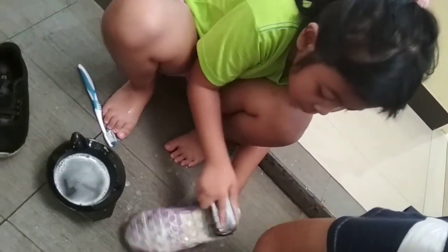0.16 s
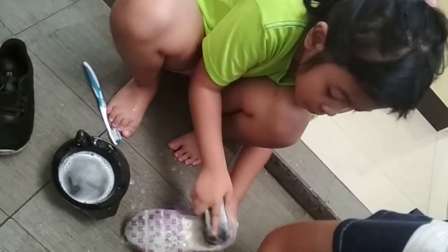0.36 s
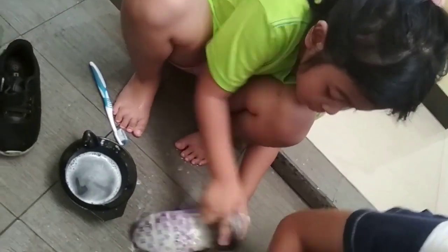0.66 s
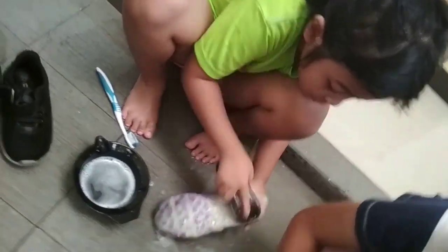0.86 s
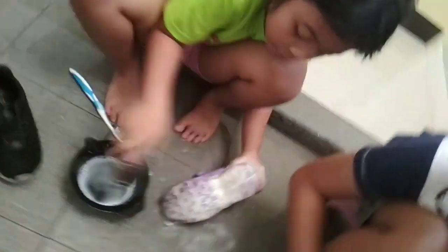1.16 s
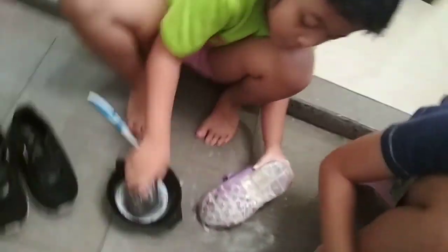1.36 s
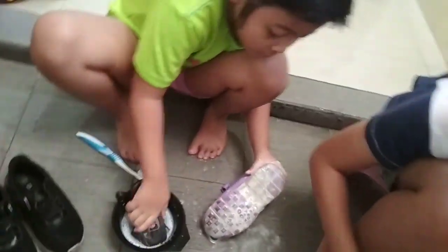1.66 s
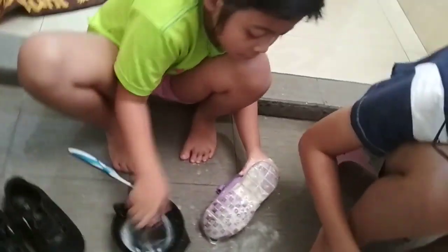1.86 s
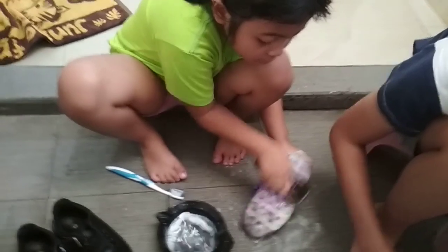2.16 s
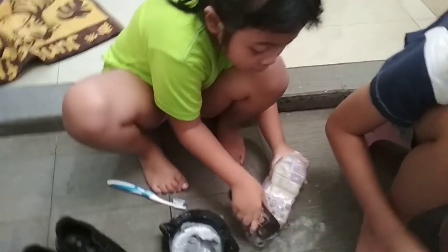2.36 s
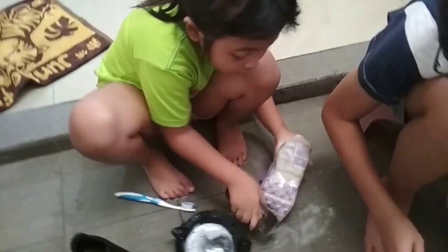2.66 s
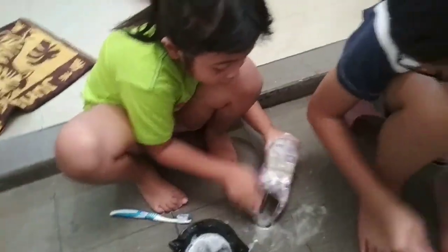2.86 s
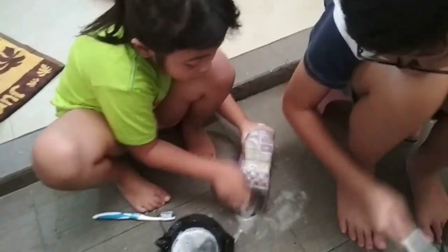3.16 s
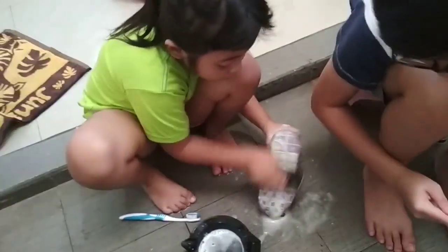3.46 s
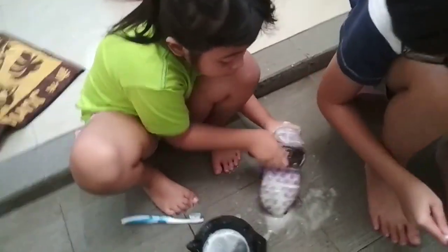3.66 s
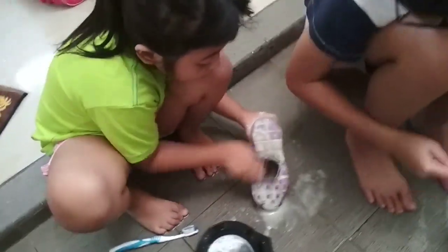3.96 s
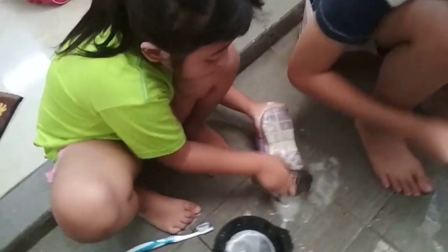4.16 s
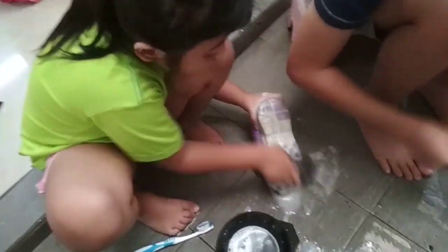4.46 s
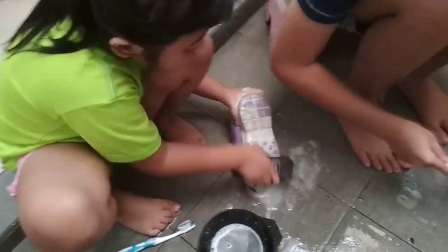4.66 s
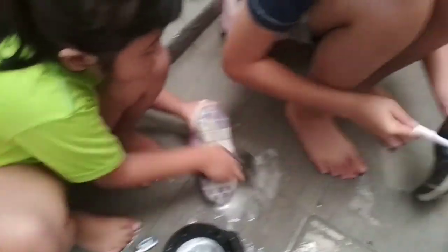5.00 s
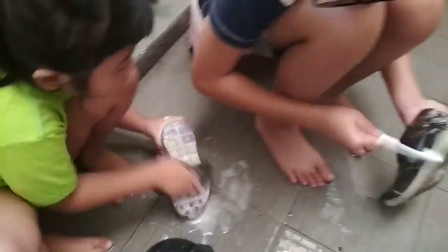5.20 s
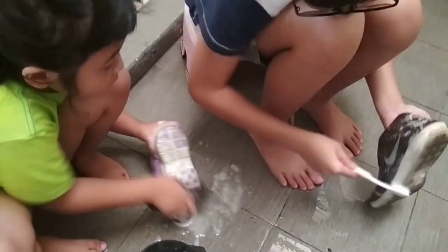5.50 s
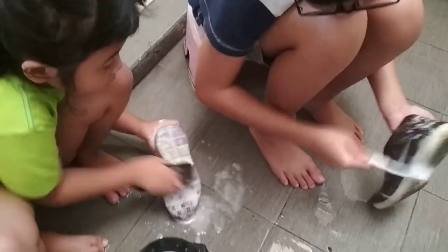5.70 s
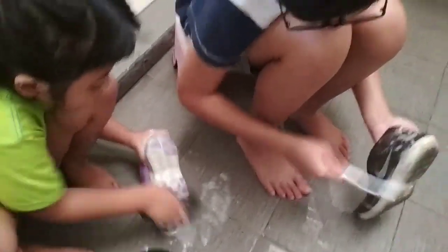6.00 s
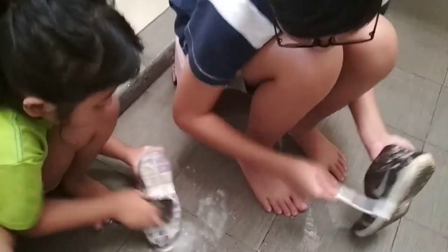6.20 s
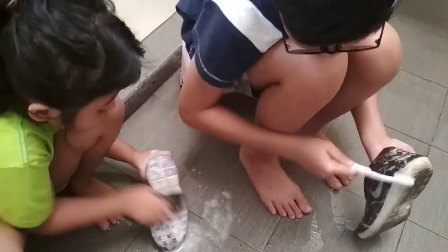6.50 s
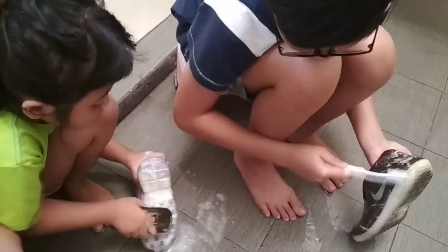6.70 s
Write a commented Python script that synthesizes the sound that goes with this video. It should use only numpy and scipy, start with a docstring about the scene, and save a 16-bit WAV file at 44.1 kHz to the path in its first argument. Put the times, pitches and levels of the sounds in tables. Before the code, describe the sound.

Two stiff brushes scrub wet, soapy shoes in quick scratchy strokes, with a brief knock on a tiled floor near the start.

```python
"""A low boom dies away under the quick hiss of two stiff brushes scrubbing wet shoes over a tiled floor.
Bristle tips flick off the tread in dense impulses whose level follows the speed of the hand. Something
knocks on the tiles and rings in damped modes. After the first second the harder brush bears down on a
hollow shoe, whose cavity resonates with a drone at each push. A faint hum comes and goes."""
import sys
import numpy as np
from scipy import signal
from scipy.fft import rfft, irfft, next_fast_len
from scipy.io import wavfile
from scipy.ndimage import uniform_filter1d, map_coordinates

SR = 44100
rng = np.random.default_rng(int(sys.argv[2]) if len(sys.argv) > 2 else 0)


def generate_wav(sig):
    """Save sig (samples, or channels by samples) to the path in sys.argv[1] as 16-bit PCM at SR."""
    pcm = np.round(np.clip(np.atleast_2d(sig).T, -1, 1) * 32767).astype(np.int16)
    wavfile.write(sys.argv[1], SR, pcm)


N = 301633
T = np.arange(N) / SR

# Brush strokes, from one turn of the hand to the next: (time [s], speed at the turn [dB],
# share spent speeding up [0-1], full speed [dB], relative level of the wet rasp [dB])
STROKES = [(0.0, -46, 0, -37.5, -12), (0.089, -48, 0.47, -36.5, -12.5), (0.207, -43, 0.5, -39.5, -13.5),
           (0.334, -45, 0.45, -38, -16), (0.476, -44, 0.6, -37.5, -15), (0.624, -45.5, 0.6, -39.5, -15),
           (0.723, -39.5, 0, -40.5, -16.5), (0.808, -43.5, 0.56, -40.5, -18),
           (0.923, -45.5, 0.77, -38, -20), (1.055, -43.5, 0.74, -38.5, -12), (1.142, -39.5, 0.6, -38, -8.5),
           (1.199, -44.5, 0.57, -34.5, -14.5), (1.444, -42, 0.57, -36.5, -9), (1.56, -42, 0.64, -35, -9.5),
           (1.683, -40.5, 0.58, -35.2, -11.5), (1.811, -40, 0.85, -37.5, -10.5),
           (1.948, -39, 0.5, -36.5, -9.5), (2.068, -36.5, 0.3, -36.5, -10), (2.125, -38.5, 0.87, -34, -9.5),
           (2.225, -37.5, 0, -36, -11), (2.297, -40, 0.4, -39, -6), (2.407, -46, 0.7, -37.5, -10),
           (2.564, -43.5, 0.61, -37, -9), (2.691, -46, 0.54, -35.5, -9.5), (2.901, -40.5, 0.7, -35.5, -9.5),
           (3.01, -40.5, 0.37, -37, -11.5), (3.1, -38.5, 0.34, -37, -8.5), (3.2, -40, 0.53, -36, -10.5),
           (3.288, -41.5, 0.7, -34, -13.5), (3.405, -38, 0.16, -36, -10), (3.515, -40.5, 0.2, -40.5, -7),
           (3.607, -41.5, 0.58, -36.5, -12.5), (3.699, -43, 0.58, -36.5, -10),
           (3.811, -40.5, 0.7, -37.5, -11.5), (3.894, -41.5, 0.86, -35.5, -12.5),
           (4.013, -39, 0.45, -35.5, -11.5), (4.118, -41, 0.74, -33, -13), (4.21, -38, 0.22, -35.5, -12),
           (4.308, -40.5, 0.48, -34, -15), (4.405, -38.5, 0.4, -40.5, -12.5),
           (4.465, -37.5, 0.7, -36, -12.5), (4.652, -39.5, 0.1, -39, -9.5), (4.712, -41, 0.26, -40, -7),
           (4.777, -45.5, 0.7, -40.5, -9.5), (4.899, -44, 0.9, -40.5, -9), (4.976, -40.5, 0.26, -36.5, -17),
           (5.098, -37, 0.63, -36, -11), (5.188, -42.5, 0.6, -37, -14.5), (5.303, -42, 0.7, -39, -8.5),
           (5.398, -39, 0.8, -37.5, -16.5), (5.502, -38, 0.57, -36.5, -12),
           (5.592, -43, 0.93, -35.5, -14.5), (5.695, -40.5, 0.49, -36, -17),
           (5.822, -43.5, 0.8, -35.5, -15.5), (5.929, -39, 0.4, -36, -16.5),
           (6.024, -37.5, 0.6, -34.5, -21.5), (6.129, -40.5, 0.35, -34.5, -12.5),
           (6.231, -41.5, 0.7, -35.0, -15.5), (6.346, -39.5, 0.83, -36.5, -12.5),
           (6.448, -40.5, 0.6, -35, -13), (6.553, -36, 0.3, -34.5, -11.5), (6.657, -41, 0.53, -34.5, -11.5),
           (6.767, -41.5, 0.5, -35, -12.5)]
ORDINARY_DB = -37  # an ordinary stroke on that speed scale, and the reference level of the hiss
# Spectrum of the wet rasp: (frequency [Hz], relative density [dB])
RASP_SPECTRUM = [(700, -66), (1050, -8), (1250, -7.5), (1500, -4), (2000, -0.5), (2800, -4.5), (3400, -2.5),
                 (4400, 0.5), (5500, -2.5), (8000, -3.5), (10000, -0.5), (12000, -53)]


def amp(db):
    """Amplitude ratio of a level in decibels."""
    return 10 ** (np.asarray(db) / 20)


def unit(x):
    """Normalisation to an rms of 1."""
    return x / np.sqrt(np.mean(x ** 2) + 1e-20)


def along(points, hz):
    """Interpolation of (frequency, value) points on a logarithmic axis, end values held."""
    f, v = np.transpose(points)
    return np.interp(np.log(hz + 1), np.log(f + 1), v)


def envelope(points):
    """Amplitude envelope through (time, level) points, silent outside them."""
    s, db = np.transpose(points)
    return amp(np.interp(T, s, db, left=-140, right=-140))


def wobble(rate):
    """Smooth random modulation: a spline through `rate` Gaussian values a second."""
    return map_coordinates(rng.standard_normal(int(N * rate / SR) + 4), [T * rate])


def filtered(x, response):
    """Linear filtering: the spectrum of x is multiplied by a frequency response."""
    m = next_fast_len(N + 8192)
    return irfft(rfft(x, m) * response(np.fft.rfftfreq(m, 1 / SR)), m)[..., :N]


def grainy_noise(spectrum, spread_db, bunch_db, patchy_db):
    """Superposition: dense impulses of uneven size merge into partly coherent stereo noise of rms 1."""
    # Likeness of the two channels: (frequency [Hz], left-right correlation [0-1])
    coherence = [(60, 0.96), (300, 0.83), (700, 0.67), (1400, 0.043), (15000, 0.0084)]
    sizes = amp(spread_db * rng.exponential(size=N) + bunch_db * wobble(350))
    bins = signal.stft(sizes * rng.standard_normal((2, N)), nperseg=256)[2]
    patches = uniform_filter1d(rng.standard_normal(bins.shape[1:]), size=2, axis=0)
    patches = uniform_filter1d(patches, size=8, axis=1)  # each band flickers on its own
    pair = signal.istft(bins * amp(patchy_db * unit(patches)), nperseg=256)[1][:, :N]

    def mid_side_response(hz):
        angle = np.arccos(np.clip(along(coherence, hz), -1, 1)) / 2
        return amp(along(spectrum, hz)) * [np.cos(angle), np.sin(angle)]

    mid, side = filtered(pair, mid_side_response)
    return unit(np.array([mid + side, mid - side]))


def room_hush():
    """Ambient noise: a faint floor with most of its power at low frequencies."""
    # Spectrum of the still room: (frequency [Hz], relative density [dB])
    spectrum = [(20, 10), (80, 7.5), (150, 1.5), (300, -35), (600, -50), (900, -56), (2000, -30),
                (16000, -42)]
    return amp(-77) * grainy_noise(spectrum, spread_db=-1.5, bunch_db=2.5, patchy_db=1.5)


def hum(pitch_hz=138, rise_db_per_s=142, fade_db_per_s=50):
    """Amplitude modulation: a faint, wavering low tone swells and fades."""
    # Crests of the hum: (time [s], level [dB])
    crests = [(.99, -78.5), (1.326, -82), (1.68, -76), (2.13, -79)]
    flutter = amp(2.7 * wobble(13))
    phase = 2 * np.pi * np.cumsum(pitch_hz * (1 + 0.03 * wobble(26.3))) / SR
    swells = sum(amp(db + rise_db_per_s * np.minimum(T - s, 0) - fade_db_per_s * np.maximum(T - s, 0))
                 for s, db in crests)
    return swells * flutter * np.sqrt(2) * np.sin(phase)


def boom(pitch_hz=90.5):
    """Room resonance: one low mode dies away unevenly, with rumble around it."""
    # Decay of the boom: (time [s], level [dB])
    decay = [(0.0, -42.5), (0.064, -44), (0.122, -49), (0.16, -45.5), (0.232, -48.5), (0.256, -54.5),
             (0.302, -49.5), (0.348, -62.5), (0.42, -62)]
    # Spectrum of the rumble: (frequency [Hz], relative density [dB])
    spectrum = [(25, 5.5), (50, -1), (130, 3.5), (200, -14.5), (280, -27)]
    phase = 2 * np.pi * np.cumsum(pitch_hz * (1 + 0.029 * wobble(22))) / SR
    rumble = unit(filtered(rng.standard_normal(N), lambda hz: amp(along(spectrum, hz))))
    return envelope(decay) * (np.sqrt(2) * np.sin(phase) + amp(-6.5) * rumble)


def knock_tail():
    """Resonance near 500 Hz, low and rough: faint before the knocks, swelling with them, then dying."""
    # Course of the resonance: (time [s], level [dB])
    course = [(0.0, -66), (0.104, -89), (0.138, -70), (0.172, -75), (0.2, -94), (0.26, -86), (0.284, -79),
              (0.31, -84), (0.36, -87), (0.42, -54.5), (0.448, -48.5), (0.5, -66), (0.54, -47), (0.61, -55),
              (0.794, -67), (0.87, -93)]
    # Spectrum of the resonance: (frequency [Hz], relative density [dB])
    spectrum = [(300, -40), (370, -6), (410, -2.5), (470, 4), (540, -10), (620, -1.5), (700, -29),
                (800, -39)]
    return envelope(course) * grainy_noise(spectrum, spread_db=2, bunch_db=-1.5, patchy_db=0)


def tiled_room(x):
    """Reverberation: convolution with a noise tail in which each frequency decays at its own rate."""
    # Reverberation time of the room: (frequency [Hz], T60 [s])
    decay_times = [(150, 0.21), (250, 0.22), (500, 0.73), (800, 0.35), (1300, 0.67), (1700, 0.61),
                   (3000, 0.14)]
    hz, t, bins = signal.stft(rng.standard_normal((2, SR // 2)), SR, nperseg=256)
    tail = signal.istft(bins * amp(-60 * t / along(decay_times, hz)[:, None]), SR, nperseg=256)[1]
    tail[1] = 0.34 * tail[0] + 1.07 * tail[1]  # the right channel shares part of the left
    return signal.fftconvolve(x[None], tail / np.linalg.norm(tail[0]), axes=1)[:, :N]


def knocks():
    """Modal vibration: each contact excites the same damped modes; a brighter one favours the high ones."""
    # Contacts with the tiles: (time [s], relative level [dB], treble tilt [dB/octave], attack [s])
    contacts = [(0.406, -51, 9, 0.0042), (.42, -44, 12.5, .008), (.44, -35, 12, 0.0029),
                (0.458, -44, -2, 0.0028), (0.479, -41.5, 3, 0.0027), (0.515, -42.5, -11, 0.002),
                (0.53, -43, 5, 0.0039), (0.466, -50, 6, .003), (.562, -43, 4, 0.0036),
                (0.589, -43, -4, 0.0079)]
    # Modes of the knocked object: (frequency [Hz], relative level [dB], T60 [s])
    modes = [(207, -1.5, 0.068), (273, -3, 0.094), (404, -4, 0.047), (500, -6, 0.063), (620, -23, 0.039),
             (755, -1, 0.025), (1005, -6, 0.023), (1232, 4, 0.014), (1420, 7, 0.012), (1670, -3.5, .01),
             (2130, -18, 0.012)]
    out, t = np.zeros(N + SR), T[:SR // 2]
    mode = lambda hz, db, t60: amp(db - 60 * t / t60) * np.sin(2 * np.pi * hz * t)
    for s, db, tilt, attack in contacts:
        low = sum((-1) ** k * mode(hz, mode_db + rng.normal(0, 1), t60)  # neighbours move oppositely
                  for k, (hz, mode_db, t60) in enumerate(modes[:4]))
        high = sum(mode(hz, mode_db + tilt * np.log2(hz / 500), t60) for hz, mode_db, t60 in modes[4:])
        onset = 1 - np.exp(-(t / attack) ** 2)
        out[round(s * SR):][:len(t)] += amp(db - 5.5) * onset * (low + high)
    return out[:N]


def hand_speed(fall_exponent=2.07):
    """Reciprocating motion: speed rises and falls on quarter-sine arcs; 1 is an ordinary stroke."""
    turns, turn_db, share, full_db = np.transpose(STROKES)[:4]
    k = np.searchsorted(turns, T, side="right") - 1  # the stroke under way
    progress = (T - turns[k]) / np.diff(turns, append=N / SR)[k]
    share = np.clip(share, 0.05, 0.95)[k]
    rising = progress < share
    next_turn_db = np.append(turn_db[1:], turn_db[-1] + 7)
    at_turn = amp(np.where(rising, turn_db[k], next_turn_db[k]))
    ramp = np.clip(np.where(rising, progress / share, (1 - progress) / (1 - share)), 0, 1)
    arc = np.sin(np.pi / 2 * ramp) ** np.where(rising, 1, fall_exponent)
    return (at_turn + (amp(full_db[k]) - at_turn) * arc) / amp(ORDINARY_DB)


def block_bumps(attack_s=0.0042, t60_s=0.032):
    """Impact excitation: the brush block bumps the shoe, which answers with one damped sinusoid."""
    # Bumps on the shoe: (time [s], relative level [dB], frequency [Hz])
    bumps = [(1.087, -41.5, 504), (1.089, -50, 770), (1.577, -30.5, 506), (1.92, -39, 1240),
             (2.131, -32, 555), (2.276, -32.5, 1026), (2.374, -34, 440), (2.376, -36.5, 1010),
             (2.965, -36, 430), (3.331, -39, 550), (3.349, -39, 664), (3.34, -36.5, 397), (4.44, -42, 400),
             (4.579, -45, 340), (5.881, -43, 524), (5.92, -42, 790), (6.55, -42, 660)]
    out, t = np.zeros(N + SR), T[:SR // 8]
    for s, db, hz in bumps:
        gain = amp(db + 2.5 - 60 * t / t60_s) * (1 - np.exp(-t / attack_s))
        out[round(s * SR):][:len(t)] += gain * np.sin(2 * np.pi * hz * t)
    return out[:N]


def cavity_tones(slope_db_per_s=500):
    """Cavity resonance: the hollow shoe sings briefly on single, slightly wavering tones."""
    # Tones of the cavity: (time [s], hold [s], frequency [Hz], level [dB])
    tones = [(1.177, 0.024, 549, -65), (1.616, 0.075, 460, -67), (2.614, 0.051, 504, -59),
             (3.268, 0.08, 529, -60), (3.397, 0.047, 524, -68), (3.826, 0.079, 462, -56),
             (3.971, 0.046, 504, -59), (4.171, 0.13, 522, -59.5), (4.634, 0.088, 457, -60.5),
             (4.874, 0.043, 529, -61.5), (4.959, 0.06, 458, -62), (5.143, 0.086, 530, -62.5),
             (5.443, 0.05, 515, -62.5), (6.311, 0.03, 593, -64.5)]
    wavering_time = np.cumsum(1 + 0.0116 * wobble(30)) / SR
    out = np.zeros(N)
    for s, held, hz, db in tones:
        outside_hold_s = np.maximum(np.abs(T - s - held / 2) - held / 2, 0)
        gain = amp(db - slope_db_per_s * outside_hold_s)
        out += gain * np.sqrt(2) * np.sin(2 * np.pi * hz * wavering_time)
    return out


def push_gains(lands_s=1.082, rise_db_per_s=513):
    """Incoherent addition: pushes add in power, giving the gains of cavity, rub, deep rub and sole."""
    # The harder brush bears down on the shoe: (time [s], hold [s], cavity level [dB],
    # rub over cavity [dB], deep rub over cavity [dB], sole level [dB])
    pushes = [(1.089, 0.09, -58, -8.5, -25, -59), (1.272, 0.083, -51, -25, -30, -59),
              (1.428, 0.094, -56.5, -31, -28, -58.5), (1.585, 0.077, -50, -3.5, -10, -56),
              (1.719, 0.067, -50, -24, -26, -58), (1.868, 0.07, -56.5, -8.5, -13, -56),
              (1.992, 0.078, -53.5, -20, -28, -58), (2.131, 0.083, -49.5, -10, -22, -52),
              (2.275, 0.1, -51, -24, -27, -49), (2.372, 0.078, -54.5, -5, -27, -59),
              (2.471, 0.051, -51.5, -13.5, -20, -52.5), (2.576, 0.088, -55, -28, -29, -59.5),
              (2.709, 0.14, -54, -9, -23, -57.5), (2.943, 0.056, -49.5, -21.5, -41, -53),
              (3.064, 0.066, -53, -29, -28.5, -53), (3.188, 0.071, -56, -16, -22.4, -55),
              (3.325, 0.06, -54, -6.5, -12.5, -54.5), (3.42, 0.11, -57.5, -22, -23, -53.5),
              (3.596, 0.096, -55.5, -17.5, -28, -55.5), (3.722, 0.08, -57.5, -25, -27, -54.5),
              (3.84, 0.12, -63, -11, -26, -64), (3.917, 0.16, -56, -20.5, -30, -55.5),
              (4.14, 0.11, -52, -16, -35, -56.5), (4.331, 0.044, -55, -9.5, -24, -56),
              (4.443, 0.059, -54.5, -11, -16, -53.5), (4.572, 0.039, -56, 3, -18, -53),
              (4.65, 0.092, -53.5, -12, -28, -58), (4.811, 0.061, -54, -18, -28, -56),
              (4.956, 0.05, -55, -26, -34, -55.5), (5.07, 0.073, -58, -22, -25, -53),
              (5.2, 0.14, -59.5, -35, -28, -60), (5.367, 0.044, -58, -15.5, -32, -57),
              (5.473, 0.057, -54.5, -11.5, -32, -57.5), (5.597, 0.13, -61.5, -24, -28, -56.5),
              (5.872, 0.079, -56.5, -10, -21, -55), (6.014, 0.13, -58.5, -6.5, -33, -58),
              (6.121, 0.1, -59.5, -25, -30, -55.5), (6.282, 0.033, -58, -49, -32, -57),
              (6.4, 0.048, -60.5, -30, -24, -53), (6.518, 0.083, -54, -27, -28, -54),
              (6.666, 0.15, -56.5, -18, -31, -53.5)]
    s, held, cavity_db, rub_db, deep_db, sole_db = np.transpose(pushes)[..., None]
    t = T[::40]

    def contour_db(lag_s, fall_db_per_s):
        age = t - s - lag_s
        return rise_db_per_s * np.minimum(age, 0) - fall_db_per_s * np.maximum(age - held, 0)

    press_db = cavity_db + contour_db(lag_s=0, fall_db_per_s=218)
    drag_db = cavity_db + contour_db(lag_s=0.011, fall_db_per_s=203)
    scrape_db = sole_db + contour_db(lag_s=0.0078, fall_db_per_s=146)
    return [np.interp(T, t, np.linalg.norm(amp(db), axis=0) * (t > lands_s))
            for db in (press_db, drag_db + rub_db, drag_db + deep_db, scrape_db)]


def shoe():
    """Forced vibration: at each push the cavity drones, the shoe rubs the tiles and the sole scrapes."""
    # Spectra of cavity, rub, deep rub and sole: (frequency [Hz], relative density [dB])
    cavity_spectrum = [(220, -70), (300, -67), (360, -7), (415, 0.5), (440, -0.5), (463, 6.5), (484, -5),
                       (505, 6), (530, 0), (600, -2), (800, -4), (1100, -28), (1500, -72)]
    rub_spectrum = [(200, -70), (250, -13), (290, 0.5), (330, 3), (400, -3.5), (500, -70)]
    deep_spectrum = [(130, -70), (175, -9), (215, -0.5), (260, 2.5), (330, -33)]
    sole_spectrum = [(500, -70), (620, -17.5), (750, -6), (950, -2.5), (1300, -6), (2000, -9), (2600, -9),
                     (3500, -37), (5000, -63)]
    cavity_gain, rub_gain, deep_gain, sole_gain = push_gains()
    speed = uniform_filter1d(hand_speed(), size=1300)
    mean_speed = uniform_filter1d(speed, size=SR // 3)
    sole_gain *= (speed / (mean_speed + 1e-9)) ** 0.51  # the scrape dips at each turn
    cavity = cavity_gain * grainy_noise(cavity_spectrum, spread_db=1.5, bunch_db=-1, patchy_db=1.36)
    rub = rub_gain * grainy_noise(rub_spectrum, spread_db=1, bunch_db=-2, patchy_db=1.4)
    deep = deep_gain * grainy_noise(deep_spectrum, spread_db=0, bunch_db=-2.5, patchy_db=-0.5)
    scrape = sole_gain * grainy_noise(sole_spectrum, spread_db=1.5, bunch_db=-1, patchy_db=1)
    return cavity + rub + deep + scrape


def tuft_ticks(t60_s=0.004):
    """Elastic release: a stiff tuft springs free with a brief noise burst coloured like the rasp."""
    # Releases of single tufts: (time [s], relative level [dB])
    releases = [(3.4485, -29), (5.754, -26), (5.8844, -31), (5.9685, -28), (6.1744, -32)]
    gain = sum(amp(db - 14 - 60 * np.abs(T - s) / t60_s) for s, db in releases)
    return filtered(gain * rng.standard_normal((2, N)), lambda hz: amp(along(RASP_SPECTRUM, hz)))


def bristles(snap_attack_s=0.0033, snap_t60_s=0.13):
    """Stick-slip friction: the tips hiss as a power of hand speed; the suds follow it more sluggishly."""
    # Spectrum of the bristle tips: (frequency [Hz], relative density [dB])
    tip_spectrum = [(4000, -34.5), (6000, -13.5), (9200, -7), (9700, -3.5), (10600, 1.5), (12700, 4),
                    (14500, 0), (15200, -2.5), (16000, -4.5)]
    # Bristles catch and let go together: (time [s], relative level [dB])
    snaps = [(0.1142, -55), (0.2234, -42.5), (0.358, -36), (0.651, -49), (1.0634, -36.5), (2.242, -39),
             (3.447, -40), (3.716, -45), (1.822, -44), (3.827, -50), (3.938, -37), (4.139, -34),
             (4.4169, -39), (5.2136, -48), (5.3179, -38), (5.6232, -49), (5.706, -36), (5.8347, -57),
             (6.269, -35.5), (6.36, -38), (6.6808, -47)]
    speed = hand_speed()
    tip_gain = speed ** 1.62
    for s, db in snaps:
        onset = np.clip((T - s) / snap_attack_s, 0, 1)
        tip_gain += onset * amp(db - ORDINARY_DB + 2.5 - 60 * np.abs(T - s) / snap_t60_s)
    turns, rasp_db = np.transpose(STROKES)[[0, -1]]
    midstrokes = (turns + np.append(turns[1:], N / SR)) / 2
    wetness = amp(np.interp(T, midstrokes, rasp_db) + 1.5)
    suds_gain = wetness * uniform_filter1d(speed, size=1900) ** 1.66
    tips = tip_gain * grainy_noise(tip_spectrum, spread_db=0.5, bunch_db=0.5, patchy_db=1.3)
    suds = suds_gain * grainy_noise(RASP_SPECTRUM, spread_db=2.2, bunch_db=1.3, patchy_db=2.6)
    return amp(ORDINARY_DB) * (amp(-0.55) * tips + suds)


def scene():
    """Superposition: the pressures of all sources add; only the knocks reverberate."""
    hits = knocks()
    background = room_hush() + knock_tail()
    scrubbing = bristles() + tuft_ticks() + shoe() + block_bumps() + cavity_tones()
    knocking = amp(5) * hits + amp(-1.5) * tiled_room(hits)
    return background + boom() + hum() + knocking + scrubbing


def record(dry, band_limit_hz=15950):
    """Frequency response: two microphone ports colour the sound unequally, up to a band limit."""
    # Balance of the ports: (frequency [Hz], left over right [dB])
    balance = [(200, 0.5), (700, -1.5), (2400, 0.5), (4300, 1), (6200, -1.5), (8000, 2), (9600, -2),
               (11000, -5), (12400, -2.5), (13800, 5), (16000, -10)]
    return filtered(dry, lambda hz: amp(along(balance, hz) * [[0.5], [-0.5]]) * (hz < band_limit_hz))


dry = scene()
out = record(dry)
generate_wav(out)
```